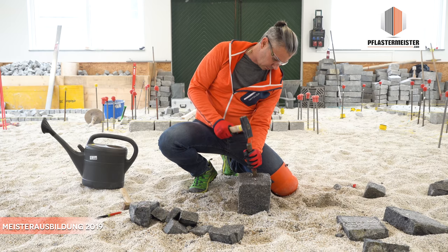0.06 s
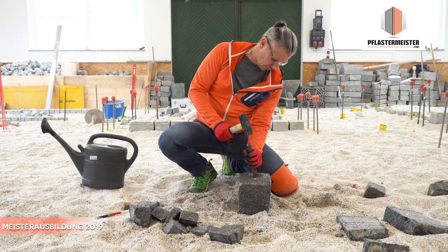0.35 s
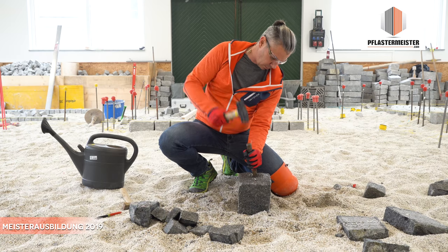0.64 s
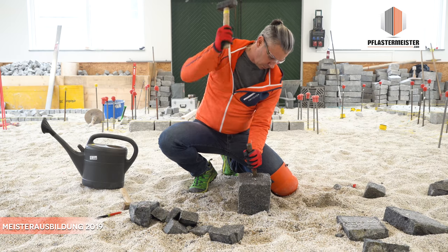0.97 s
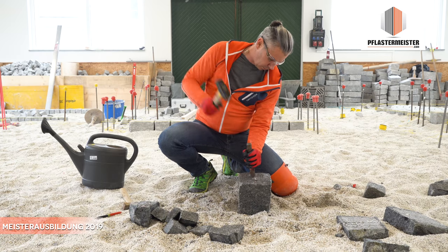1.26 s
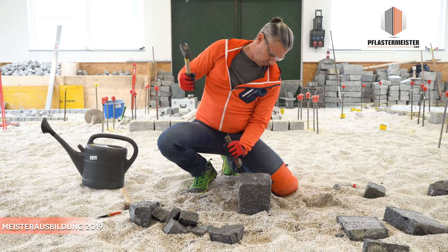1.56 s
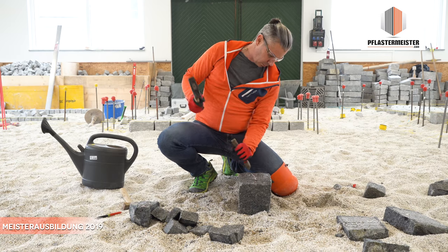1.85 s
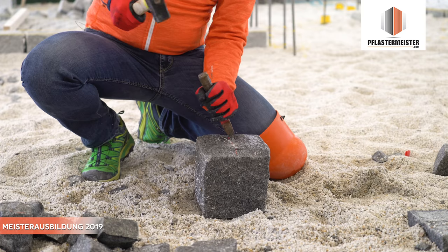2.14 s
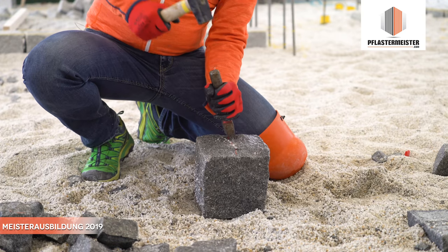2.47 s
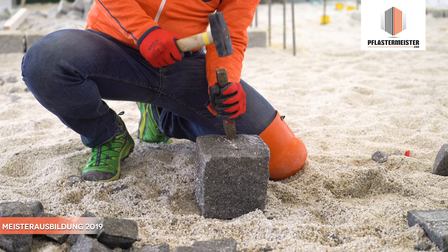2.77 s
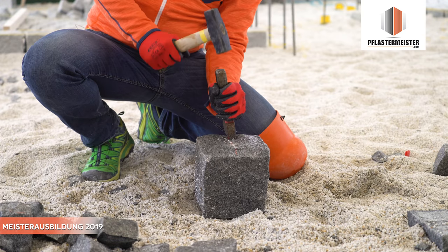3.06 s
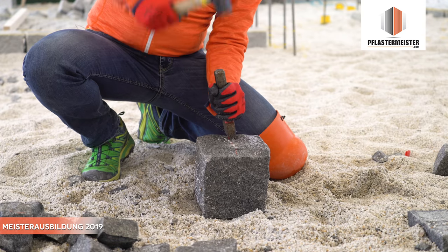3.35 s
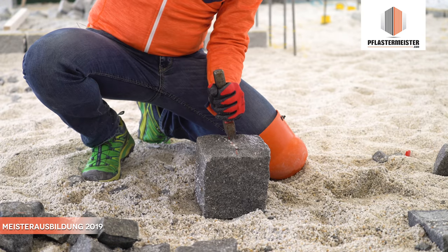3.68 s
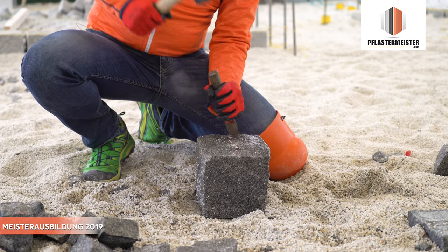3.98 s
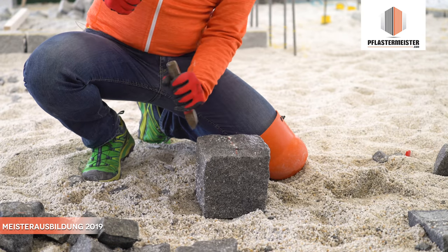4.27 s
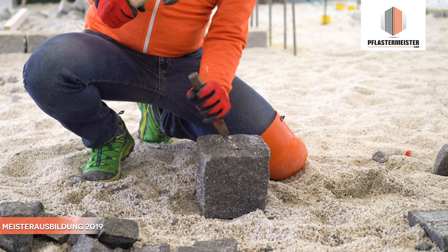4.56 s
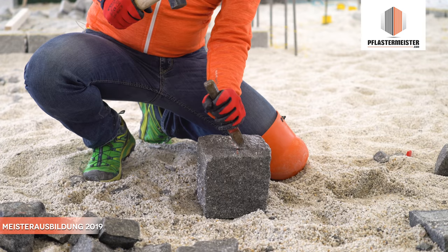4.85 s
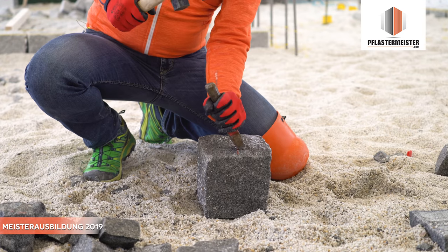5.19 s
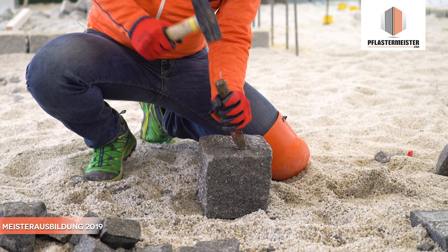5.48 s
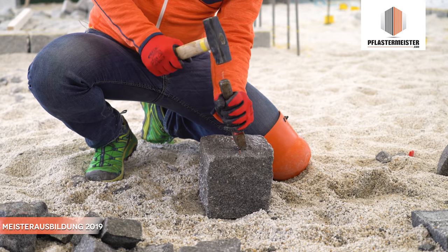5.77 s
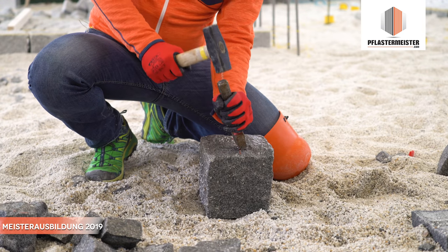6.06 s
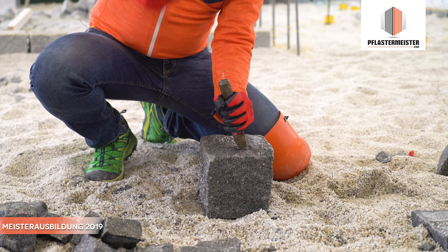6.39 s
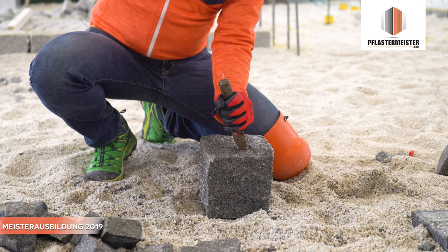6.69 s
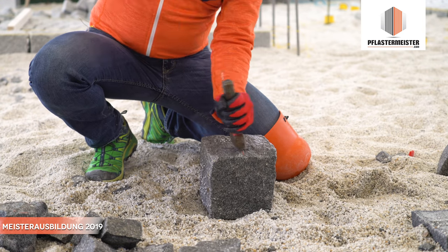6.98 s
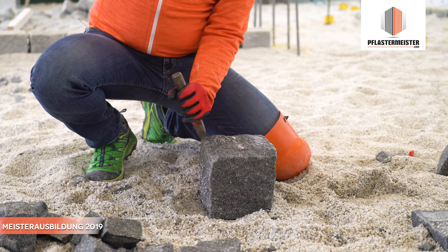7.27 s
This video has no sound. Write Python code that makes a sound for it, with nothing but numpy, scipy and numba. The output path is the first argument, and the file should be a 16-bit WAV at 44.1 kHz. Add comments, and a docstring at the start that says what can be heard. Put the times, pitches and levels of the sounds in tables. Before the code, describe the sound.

A hammer hits a steel chisel set on a stone block bedded in sand. Three light, quick taps lead to one heavy blow, and the pattern comes three times with pauses between. Each hit is a sharp crack with a brief, high metallic ring; the heavy ones add a soft thump and scattering chips. The microphone is close, in a large echoing hall with a faint low rumble.

```python
"""A hammer and chisel cut a stone block on sand in a large hall: three light taps, then one heavy
blow, three times over. Each blow cracks, knocks the block and rings chisel and hammer head;
heavy blows thump the sand, throw chips and bounce the chisel. The hall answers over a low steady
rumble. The close microphone clips on the blows; its limiter ducks the heavy ones."""
import sys
import numpy as np
from scipy import signal
from scipy.fft import rfft, irfft
from scipy.io import wavfile
from numba import njit

SR = 44100
rng = np.random.default_rng(int(sys.argv[2]) if len(sys.argv) > 2 else 0)


def bounce(signal):
    """Save signal as a 16-bit WAV file at the path given by the first command-line argument."""
    frames = np.transpose(np.atleast_2d(signal))
    limited = np.clip(frames, -1, 1)
    pcm = np.round(limited * 32767).astype(np.int16)
    wavfile.write(sys.argv[1], SR, pcm)


N = 327663
T = np.arange(SR) / SR  # one second after a blow


def undb(db):
    """Decibels to gain."""
    return 10 ** (np.asarray(db) / 20)


def fade(t60_s):
    """Free decay."""
    return np.exp(-np.log(1000) * T / t60_s)


def swell(peak_s):
    """Smooth push: peaks at 1, dies away."""
    return (T / peak_s * np.exp(1 - T / peak_s)) ** 2


def add(track, start_s, sound):
    """Mix a sound into the track."""
    part = track[..., max(int(start_s * SR), 0):][..., :sound.shape[-1]]
    part += sound[..., :part.shape[-1]]


def colour(spectrum, size):
    """FFT-bin gains from (f/Hz, level/dB) points."""
    hz, db = np.transpose(spectrum)
    bins_hz = np.fft.rfftfreq(size, 1 / SR) + 1
    return undb(np.interp(np.log(bins_hz), np.log(hz), db))


def noise(spectrum, size):
    """Coloured noise, rms 1."""
    x = irfft(rfft(rng.standard_normal(size)) * colour(spectrum, size), size)
    return x / x.std()


def jolt(spectrum, lag_s):
    """Causal unit-energy pulse; bending waves disperse, so the treble leads."""
    cepstrum = irfft(np.log(colour(spectrum, SR)))
    minimum_phase = np.exp(rfft(2 * cepstrum * (T < .5)))
    khz = np.fft.rfftfreq(SR, 1 / SR) / 1000
    delay_s = lag_s * (np.maximum(khz, .5) ** -.5 - khz[-1] ** -.5)
    pulse = irfft(minimum_phase * np.exp(-2j * np.pi * np.cumsum(delay_s))) * (T < .5)
    return pulse / np.linalg.norm(pulse)


# Hall noise spectrum: f/Hz, level/dB
RUMBLE_SPECTRUM = [(13, -33), (22, -11.5), (70, 1.5), (118, -3), (236, -8), (270, -11.5), (792, -17),
                   (1200, -23.5), (1300, -23), (1910, -23.5), (2980, -26.5), (3420, -29.5), (14700, -34.5),
                   (16000, -37)]
def rumble(start_db=-54, rise_db_per_s=1.3056):
    """Low rumble and faint hiss of the hall, slowly growing."""
    return noise(RUMBLE_SPECTRUM, N) * undb(start_db + rise_db_per_s * np.arange(N) / SR)


# Steel on stone: f/Hz, level/dB
CRACK_SPECTRUM = [(200, -14), (700, -3.5), (1600, -13), (2200, 0), (3100, 1.5), (4600, 0.5), (5700, -5.5),
                  (6700, -5.5), (7800, -10), (11000, -19.5), (16000, -22.5)]
def crack(crush_s, bite_db=8, crush_db=-10, powder_db=-31):
    """The edge bites and crushes the stone; the powder crackles on."""
    bite = undb(bite_db) * jolt(CRACK_SPECTRUM, lag_s=0.0023895)
    crushing = undb(crush_db) * swell(crush_s) + undb(powder_db) * fade(t60_s=0.047)
    return bite + crushing * noise(CRACK_SPECTRUM, SR)


# Block damped by its sand bed: f/Hz, level/dB
BLOCK_SPECTRUM = [(80, -28), (160, -16), (290, -31), (400, -14.5), (500, -7), (640, -1), (950, -0.5),
                  (1250, -8.5), (2000, -20.5), (5000, -60.5)]
def knock(jolt_db=12, shiver_db=-26):
    """The block jolts, then shivers briefly on the sand."""
    shiver = undb(shiver_db) * noise(BLOCK_SPECTRUM, SR) * fade(t60_s=0.1)
    return undb(jolt_db) * jolt(BLOCK_SPECTRUM, lag_s=0.001798) + shiver


# Edge against stone: f/Hz, level/dB
CLACK_SPECTRUM = [(700, -31.5), (1300, 1), (1650, 2), (1850, 4), (2150, -33.5), (4000, -43)]
def clack(lean, usual_db=4, db_per_lean=4):
    """The edge clacks on the stone, louder with positive lean."""
    return undb(usual_db + db_per_lean * lean) * jolt(CLACK_SPECTRUM, lag_s=0.00064)


# Steel modes (chisel bending x2, hammer head x2, chisel lengthwise, then weak ones): f/Hz
MODE_HZ = [3490, 3962, 8583, 9718, 12952, 3740, 6775, 7070, 8925, 10036, 11222, 12640, 13466, 15665]
# Same modes: level/dB, t60/s, hallward over micward level/dB
MODE_RING = [(18.5, 0.043, 13), (9.5, .065, 10), (13.5, 0.057, -2), (5.5, 0.16, 1.5), (5.5, 0.085, 3),
             (-3.5, 0.046, -2.5), (10.5, 0.018, 3.5), (-11, 0.087, 13.5), (0.5, 0.11, 13), (-5, 0.049, 6),
             (-1, 0.043, 10.5), (-5, .04, 0.5), (-13, .06, 5), (-12.5, 0.043, 3)]
def steel(excitation_db, stretch=1, onset_s=0.00027):
    """Chisel and hammer ring, damped by glove and stone. Rows: to microphone, to hall."""
    out = 0
    for hz, (db, t60_s, hallward_db), drive_db in zip(MODE_HZ, MODE_RING, excitation_db):
        gripped_hz = hz * (1 + .0008 * rng.standard_normal())
        tone = np.sin(2 * np.pi * (gripped_hz * T + rng.random()))
        ring = undb(db + drive_db) * fade(t60_s * stretch) * tone
        out = out + np.outer([1, undb(hallward_db)], ring)
    return out * (1 - np.exp(-T / onset_s))


def mode_excitation_db(force_db, lean, spot):
    """Force raises all modes; lean turns bending sideways; spot trades lengthwise for head ring."""
    chisel_db = -40 + 1.346 * force_db
    strong_db = [chisel_db - lean,  # main bending
                 -41 + 1.5 * force_db + 8.5 * lean,  # sideways bending
                 -30 + 0.66 * force_db + 9.5 * spot,  # head
                 chisel_db - 7 + 8.5 * lean,  # head, upper
                 chisel_db + 4 - 7.5 * spot]  # lengthwise
    weak_db = -36.5 + 1.4 * force_db
    return strong_db + [weak_db] * (len(MODE_HZ) - len(strong_db))


# Blows: t/s, force/dB, chisel lean, spot on hammer face (both 0 = usual, about -1 to 1)
HAMMER_BLOWS = [(0.0346, -2.5, -1.6, -0.67), (.3050, -1.3, -0.53, -0.94), (0.5436, -0.5, -0.15, -0.51),
                (1.281, 17.5, 0.29, 0.052), (2.8105, -1, -.3, -0.056), (3.0788, -0.2, 0.095, 0.27),
                (3.3037, 2.5, -0.35, 0.5), (3.9615, 16, -0.1, 0.24), (5.7377, 1.5, 0.83, -0.36),
                (6.0105, 1, 0.71, -0.4), (6.2500, 1.5, 0.91, -0.064), (6.9828, 19.5, 0.0059, -0.17)]
def hammering():
    """Each blow sounds steel, crack, block and clack at once. Rows: to microphone, to hall."""
    out = np.zeros((2, N))
    for start_s, force_db, lean, spot in HAMMER_BLOWS:
        # a hard blow crushes longer and throws the chisel clear to ring longer
        stretch = 1 + 0.057 * undb(force_db)
        add(out, start_s, steel(mode_excitation_db(force_db, lean, spot), stretch) / stretch)
        add(out, start_s, undb(force_db) * crack(crush_s=0.00078 * stretch))
        add(out, start_s, undb(0.55 * force_db) * knock() + clack(lean))
    return out


# Reverberation bands: f/Hz, level/dB, t60/s
HALL_BANDS = [(60, -2.5, 1.4), (159, -3.5, 0.39), (385, -27.5, 1), (887, -47, 1.6), (1850, -22, 0.6),
              (2970, -31, 0.9), (3513, -25, 0.72), (6040, -30, 0.5), (9190, -22.5, .48), (15000, -20, 0.28)]
# Far-wall returns: delay/s, width/s, lift/dB
FAR_WALLS = [(.021, .005, 3), (.05, .011, 7.5), (.089, .006, 3), (.167, .005, 7)]
def hall(sound, nearest_wall_s=0.0092):
    """Diffuse tail: starts at the nearest wall, swells as the far walls answer."""
    bands_hz, bands_db, t60s_s = np.transpose(HALL_BANDS)
    bins_hz = np.fft.rfftfreq(SR, 1 / SR) + 1
    white, tail = rfft(rng.standard_normal(SR)), 0
    for db, t60_s, share in zip(bands_db, t60s_s, np.eye(len(bands_hz))):
        band = irfft(white * np.interp(np.log(bins_hz), np.log(bands_hz), share), SR)
        decay = fade(t60_s)
        tail = tail + undb(db) * band * decay / np.linalg.norm(decay)
    walls_db = sum(db * np.exp(-((T - delay_s) / width_s) ** 2) for delay_s, width_s, db in FAR_WALLS)
    return signal.fftconvolve(sound, tail * (T > nearest_wall_s) * undb(walls_db))[:N]


def thump(rocking_db, sinking_db=-25):
    """The block sinks into the sand and rocks back: low noise."""
    sand_hz_db = [(20, -10.5), (70, 9), (145, 7), (330, -8), (1200, -49.5), (4000, -90.5)]
    push = undb(sinking_db) * swell(peak_s=0.003) + undb(rocking_db) * swell(peak_s=0.082)
    return noise(sand_hz_db, SR) * push


def chips(count=1200, mean_flight_s=0.09, thinning_s=0.2):
    """Splinters and sand grains land round the block, adding in power."""
    grit_hz_db = [(300, 0), (1200, 2), (2800, 3), (7000, -7.5), (11000, -7.5), (16000, -21.5)]
    power = np.zeros(SR)
    grain = fade(0.0056)[:SR // 100]
    sizes = undb(5 * rng.standard_normal(count))
    for flight_s, size in zip(rng.gamma(2, mean_flight_s / 2, count), sizes):
        landing = np.exp(-(flight_s / thinning_s) ** 2)  # late grains have bounced, land softly
        add(power, flight_s, size * landing * grain)
    return 0.16 * np.sqrt(power) * noise(grit_hz_db, SR)


def settling(heavy_above_db=6):
    """Heavy blows thump the sand and throw chips; each leaves the block looser."""
    out = np.zeros(N)
    heavy_s = [start_s for start_s, force_db, *_ in HAMMER_BLOWS if force_db > heavy_above_db]
    for looseness, start_s in enumerate(heavy_s):
        add(out, start_s, thump(rocking_db=-46.5 + 7 * looseness))
        add(out, start_s, undb(-32.5 + 5.5 * looseness) * chips())
    return out


# Edge touches the stone again: t/s, knock/dB, scrape/dB
CHISEL_BOUNCES = [(1.3305, -5, -16), (1.639, -39, -61), (2.3256, -18.5, -41.5), (2.621, -38.5, -44.5),
                  (2.794, -30, -37), (4.835, -39.5, -48), (5.296, -40, -46), (5.397, -36.5, -39.5),
                  (6.2811, -5.5, -12.5), (7.0092, -11, -48.5), (7.066, -20, -12)]
def bouncing(tilt_db_per_octave=-10, scrape_top_hz=5500, hop_s=.017, hop_db=-16):
    """The chisel drops back or is set down and hops once: dull knock, scrape, soft low-mode ring."""
    out = np.zeros((2, N))
    ring_db = -45.5 + tilt_db_per_octave * np.log2(np.array(MODE_HZ) / MODE_HZ[0])
    lowpass = signal.butter(2, scrape_top_hz, fs=SR)
    for start_s, knock_db, scrape_db in CHISEL_BOUNCES:
        scrape = signal.lfilter(*lowpass, crack(crush_s=0.0011))
        touch = undb(knock_db) * (knock() + steel(ring_db)) + undb(scrape_db) * scrape
        add(out, start_s, touch)
        add(out, start_s + hop_s, undb(hop_db) * touch)
    return out


@njit
def follow(rectified, attack_s, release_s):
    """Envelope follower."""
    out, level = np.empty(len(rectified)), 0.
    for i, sample in enumerate(rectified):
        lag_s = attack_s if sample > level else release_s
        level += (sample - level) / (lag_s * SR)
        out[i] = level
    return out


def scene():
    """Close stonework, the hall round it; mono."""
    close, hallward = hammering() + settling() + bouncing()
    return (close + hall(hallward) + rumble())[None]


def record(dry):
    """A limiter ducks heavy blows, too late to stop clipping; the top is cut."""
    threshold_db, top_hz = -5, 15900
    envelope = follow(np.abs(dry[0]), attack_s=0.0054, release_s=0.06)
    limited = dry / np.maximum(1, envelope / undb(threshold_db))
    lowpass = signal.ellip(10, .1, 70, top_hz, fs=SR, output="sos")
    return signal.sosfilt(lowpass, np.clip(limited, -1, 1))


dry = scene()
out = record(dry)
bounce(out)
```